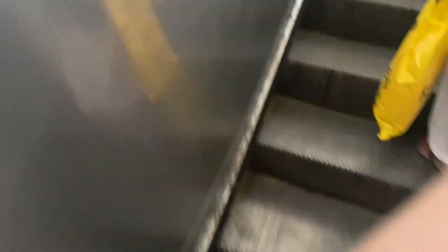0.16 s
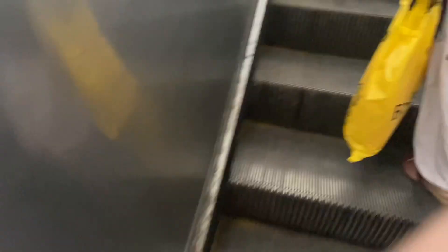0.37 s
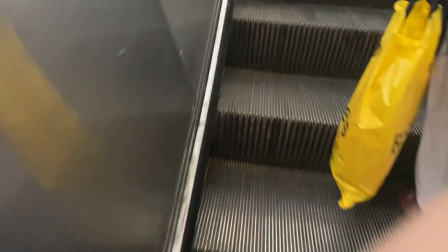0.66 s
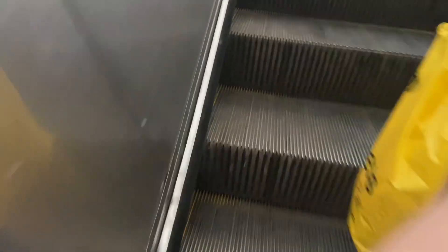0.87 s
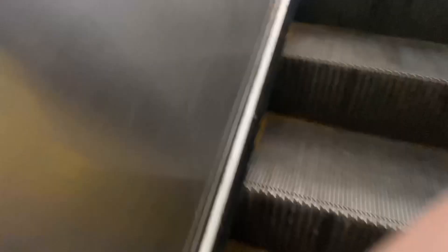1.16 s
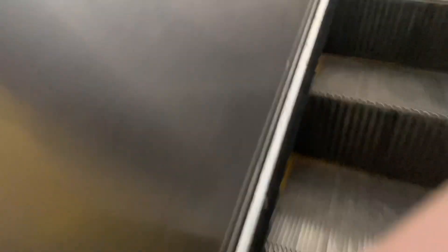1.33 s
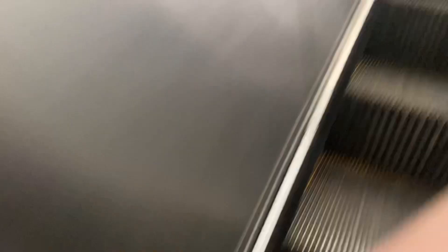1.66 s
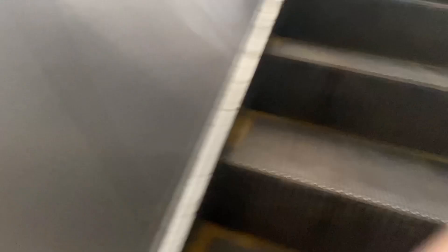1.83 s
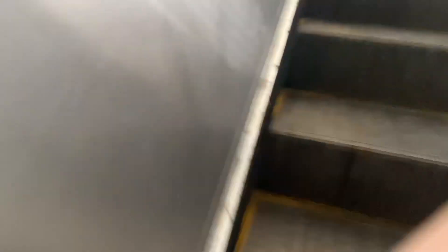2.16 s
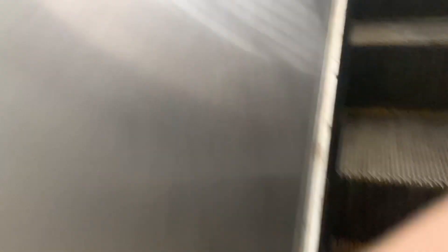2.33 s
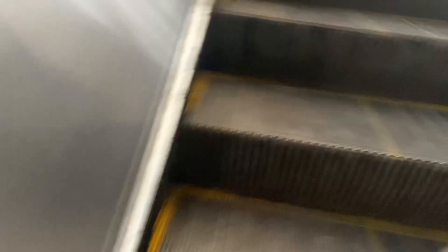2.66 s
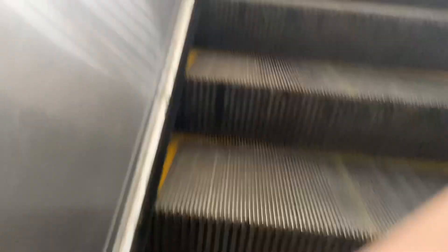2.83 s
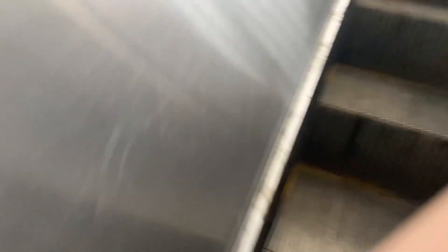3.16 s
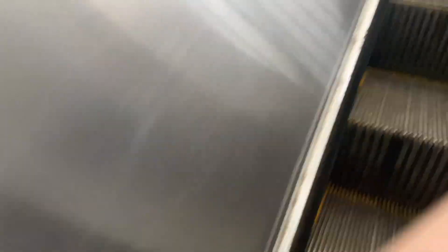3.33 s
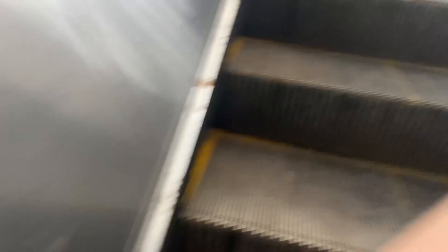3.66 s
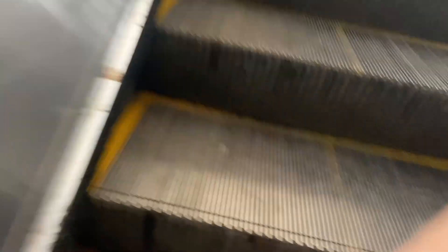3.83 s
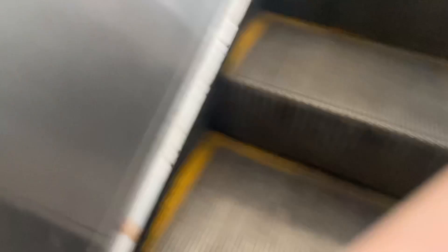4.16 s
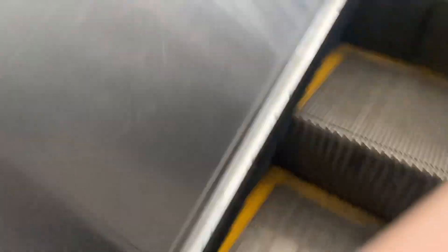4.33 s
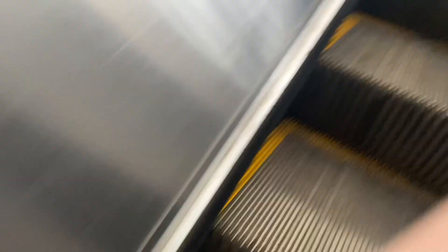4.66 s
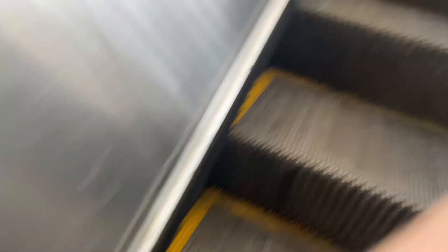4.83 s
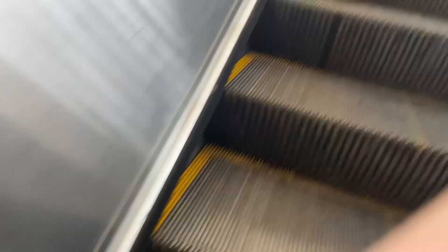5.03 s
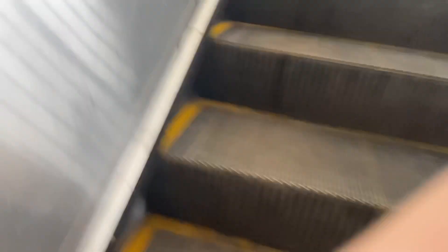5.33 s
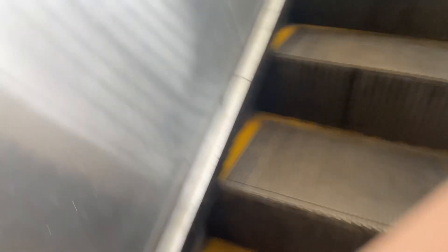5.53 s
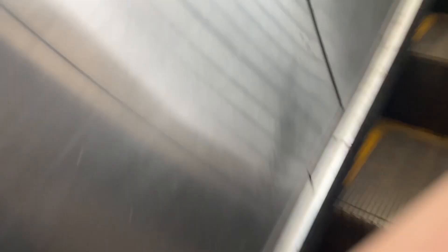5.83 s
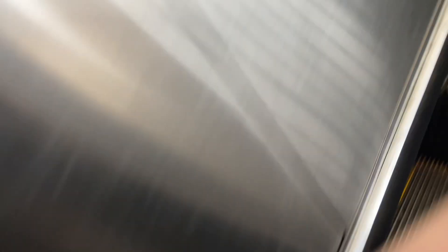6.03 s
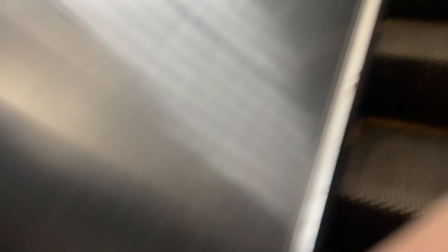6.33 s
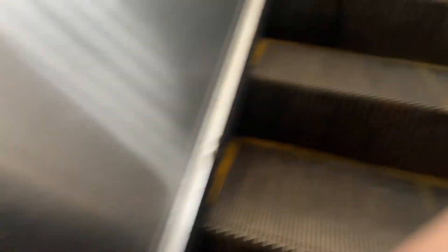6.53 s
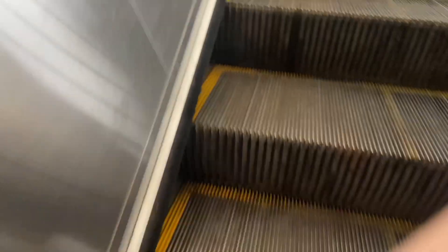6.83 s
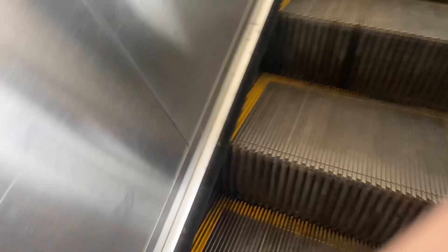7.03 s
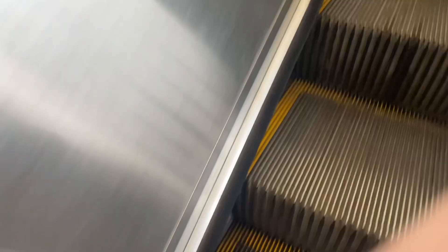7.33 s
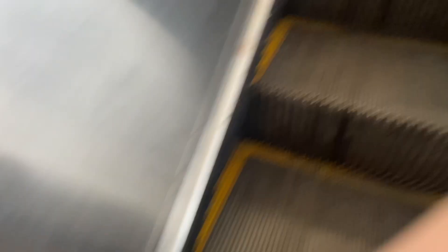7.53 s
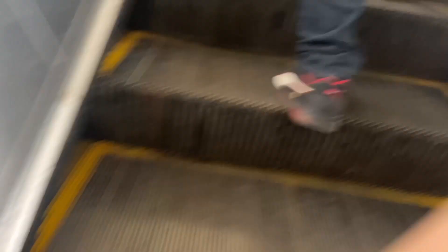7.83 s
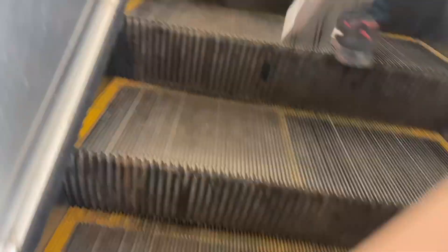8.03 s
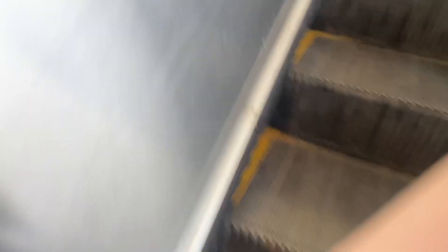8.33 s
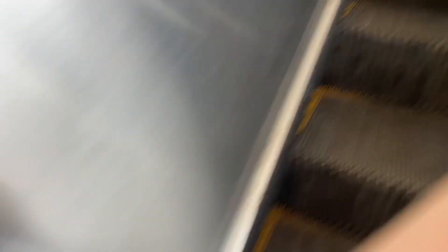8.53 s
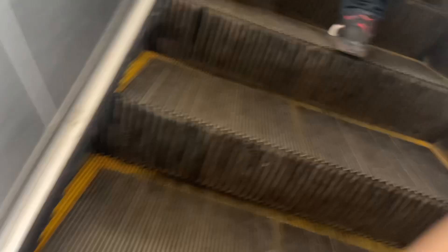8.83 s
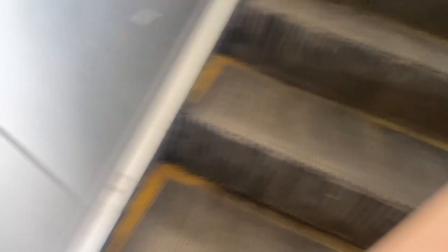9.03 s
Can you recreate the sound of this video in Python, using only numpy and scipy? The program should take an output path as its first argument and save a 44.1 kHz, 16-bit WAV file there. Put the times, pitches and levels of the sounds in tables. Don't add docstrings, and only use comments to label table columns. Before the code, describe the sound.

Low swelling escalator drone with roller roar, scattered far clanks of shoes on metal treads, then a nearby walker's quick ringing steps and bag rustles.

```python
import sys
import numpy as np
from scipy import signal
from scipy.fft import rfft, irfft, next_fast_len
from scipy.io import wavfile
from scipy.ndimage import uniform_filter1d, map_coordinates

SR = 44100
rng = np.random.default_rng(int(sys.argv[2]) if len(sys.argv) > 2 else 0)


def persist_wave(psi):
    counts = np.round(np.clip(psi, -1, 1) * 32767).astype(np.int16)
    wavfile.write(sys.argv[1], SR, np.atleast_2d(counts).T)


def field_ratio(decibels):
    return 10 ** (np.asarray(decibels, dtype=float) / 20)


N = 404838


def unit(x):
    return x / np.sqrt(np.mean(x ** 2) + 1e-20)


def along(points, hz):
    f, v = np.transpose(points)
    return np.interp(np.log(hz + 1), np.log(f + 1), v)


def wobble(rate):
    knots = rng.standard_normal(int(N * rate / SR) + 4)
    return map_coordinates(knots, [np.arange(N) * rate / SR])


def arch(start, length):
    return np.sin(np.pi * np.clip((np.arange(N) / SR - start) / length, 0, 1))


def filtered(x, response):
    n = x.shape[-1]
    m = next_fast_len(n + 8192)
    return irfft(rfft(x, m) * response(np.fft.rfftfreq(m, 1 / SR)), m)[..., :n]


def spread(common, between):
    # (frequency [Hz], level [dB])
    width = [(60, -46), (91, -43), (140, -32.5), (210, -27), (320, -14.5), (490, -8), (740, -5), (1130, -4),
             (1710, -12.5), (2600, -5.5)]
    # (frequency [Hz], level [dB])
    width_top = [(3500, -3.5), (5200, -7), (6200, 0), (7600, 10), (9000, -1), (10700, -14), (12200, 1),
                 (13300, 3), (15300, -2)]
    side = filtered(between, lambda hz: field_ratio(along(list(width) + list(width_top), hz)))
    return np.array([common + side, common - side])


def rush(spectrum, patchy_db):
    z = signal.stft(rng.standard_normal((2, N)), nperseg=512)[2]
    field = uniform_filter1d(rng.standard_normal(z.shape[1:]), size=6, axis=0)
    field = uniform_filter1d(field, size=12, axis=1)
    pair = signal.istft(z * field_ratio(patchy_db * unit(field)), nperseg=512)[1][:, :N]
    common, between = filtered(pair, lambda hz: field_ratio(along(spectrum, hz)))
    return spread(common, between) / np.std(common)


def approach():
    # (time [s], gain [dB])
    nearer = [(0, -2), (1.4, -1.5), (2.3, 0), (4, -0.5), (5.2, 0.5), (6.3, -.5), (7.8, 0), (9.18, 2)]
    s, gain_db = np.transpose(nearer)
    return np.interp(np.arange(N) / SR, s, gain_db)


def gear_hum():
    # (start [s], length [s], crest level [dB])
    loops_1 = [
        (-.4, 2.4, -25.5),
        (2.1, 4.04, -18.5),
        (5.75, 2.35, -20.5),
        (7.95, 2, -17.5),
    ]
    # (start [s], length [s], crest level [dB])
    loops_2 = [
        (.1, 2.23, -24.5),
        (2.85, 1.86, -21.5),
        (4.85, 2.38, -20.5),
        (6.75, 1.72, -21.5),
    ]
    gear_hz, node_db = 65.17, -39
    upper_db = [-31.5, -34.5]
    upper_swing_db, upper_grows = 2.5, 2.6

    turns = np.cumsum(gear_hz + 0.092 * wobble(2)) / SR
    nearer_db = approach()
    first = sum((-1) ** k * field_ratio(db) * arch(s, length) for k, (s, length, db) in enumerate(loops_1))
    second = field_ratio(node_db) + sum(field_ratio(db) * arch(s, length) for s, length, db in loops_2)
    upper = [field_ratio(db + upper_grows * nearer_db + upper_swing_db * wobble(2.5)) for db in upper_db]
    hum = 0
    for order, size in enumerate([first, second, *upper], 1):
        tone = np.sin(2 * np.pi * (order * turns + rng.random()))
        hum = hum + np.sqrt(2) * size * field_ratio(1.0 * wobble(7)) * tone
    return hum


def switching_whine():
    # (start [s], length [s], level [dB])
    spell_rows = [
        (-.08, 0.21, -50.5),
        (.15, .17, -55),
        (.72, 0.44, -52),
        (1.1, 0.18, -53),
        (1.4, 0.71, -58),
        (2.5, 1.3, -54),
    ]
    spells = sum(field_ratio(db) * np.sqrt(np.abs(arch(s, length))) for s, length, db in spell_rows)
    phase = 2 * np.pi * np.cumsum(4003 + 3.0 * wobble(8)) / SR
    return spells * field_ratio(4 + 4.2 * wobble(24)) * np.array([np.sin(phase + lag) for lag in (0, .2)])


def roar():
    # (frequency [Hz], level [dB])
    rumble = [(20, -32), (30, -19.5), (45, -3), (90, 2.5), (160, -3), (300, -9.5), (500, -33), (900, -33),
              (2500, -120)]
    # (frequency [Hz], level [dB])
    rolling = [(150, -7.5), (280, -5), (480, -6.5), (800, -12.5), (1000, -16.5), (1400, -18), (1800, -21),
               (2150, -17.5), (2450, -22), (2900, -28), (3900, -45), (6000, -120)]
    # (frequency [Hz], level [dB])
    hiss = [(2400, -20), (3300, 0), (4200, -2), (5500, -8), (6600, -17), (7600, -27), (9000, -45),
            (12000, -80)]
    # (frequency [Hz], level [dB])
    air = [(6000, -25), (7600, -10), (8600, -6), (10000, 0), (11500, -4), (12300, -9), (13300, -13),
           (15300, -15)]
    nearer_db = approach()
    uneven, grit = wobble(9.8), wobble(13)
    rumble_db = -21.5 + nearer_db + 1.3 * uneven + 1.7 * wobble(2.446)
    rolling_db = -24 + nearer_db + 0.47 * uneven + 0.59 * wobble(3.59)
    hiss_db = -44 + 0.73 * nearer_db + 0.41 * uneven + 0.6 * grit
    air_db = -55.5 + .2 * nearer_db + .6 * wobble(5.7) + 1.1 * grit
    return (field_ratio(rumble_db) * rush(rumble, patchy_db=-0.24)
            + field_ratio(rolling_db) * rush(rolling, patchy_db=1.1)
            + field_ratio(hiss_db) * rush(hiss, patchy_db=0.8)
            + field_ratio(air_db) * rush(air, patchy_db=1.6))


def hall_tail(length):
    # (frequency [Hz], t60 [s])
    hall = [(200, 0.63), (1000, 0.43), (3000, 0.27), (8000, 0.17)]
    hz, t, z = signal.stft(rng.standard_normal((2, length)), SR, nperseg=256)
    tail = signal.istft(z * field_ratio(-60 * t / along(hall, hz)[:, None]), SR, nperseg=256)[1]
    return tail / np.linalg.norm(tail[0])


def tread_ringing(t, panel_hz):
    # (frequency [Hz], level [dB], t60 [s])
    tread = [(420, 5.5, 0.12), (490, 7, 0.095), (630, 7.5, 0.1), (748, 3, 0.18), (805, 4.5, 0.36),
             (902, -3.5, 0.11), (1058, -1, 0.32), (1194, -3.5, 0.15), (1267, -10, 0.24), (1434, -1, 0.12),
             (1570, -11, 0.23), (1955, -3, 0.3), (2147, -3, 0.14), (2250, 8, 0.094), (2360, -2.5, 0.29),
             (2854, 3.5, 0.17), (3000, 9.5, 0.17), (3500, 4, 0.12)]
    hz, level_db, t60 = np.transpose(tread)[..., None]
    chance = rng.standard_normal((2, 3, len(tread), 1))
    pitch = hz * (1 + 0.0139 * chance[:, 2])
    size = field_ratio(level_db + 3.2 * chance[:, 0] - 60 * t / (.6 * t60))
    ring = (size * np.sin(2 * np.pi * pitch * t + 3 * chance[:, 1])).sum(1)
    riser = np.sin(2 * np.pi * panel_hz * t + chance[:, 1, 0])
    return ring + field_ratio(6.5 - 60 * t * panel_hz / 190) * riser


def footfalls():
    # (time [s], peak [dB], thud over peak [dB], clack over peak [dB], ringing panel [Hz])
    far_steps = [(.6125, -20, 5, -18, 580), (1.3049, -26, 15, -10, 414), (1.8311, -19.5, 6, -1, 420),
                 (2.2632, -14.5, 5, -11, 404), (2.6754, -18.5, 5, -4, 643), (3.1567, -14, 0, -12, 420),
                 (3.8298, -8, -3, -14, 605), (4.1863, -19.5, -1, -10, 467), (4.4358, -17, 5, -2, 431),
                 (4.5794, -11.5, 1.5, -4, 860), (5.0483, -13.5, -3, -17, 420)]
    # (time [s], peak [dB], thud over peak [dB], clack over peak [dB], ringing panel [Hz])
    near_steps = [(5.475, -13.5, -0.5, -1, 490), (5.7758, -15.5, -0.5, -5, 630),
                  (6.0883, -8.5, -3.5, -.5, 471), (6.415, -16, 3, -3.5, 526),
                  (6.5351, -13.5, -4.5, -4, 740), (6.6149, -10.5, -3.5, -7.5, 1110),
                  (6.7257, -8, -4, -0.5, 481), (7.0112, -16, 1, -8, 512), (7.0292, -11.5, -4, -3.5, 476),
                  (7.0758, -14.5, -0.5, -0.5, 1245), (7.2106, -8.5, -1.5, -10, 413),
                  (7.3104, -6.5, -6.5, -1, 422), (7.6099, -4.5, -5, -1, 805), (7.9064, -10, -3, -5.5, 1320),
                  (8.2342, -16.5, 3, 4, 645), (8.3254, -18.5, 2.5, -6, 560), (8.5707, -7, -4.5, -1, 411),
                  (8.7385, -13.5, -16, -8, 1180), (8.9086, -14.5, -15, -6.5, 468)]
    # step ringing dB, rattle dB, rattle t60 s, hall dB
    far_shoe, near_shoe = (-19, 7.5, .055, -15), (-17, 7, .085, -12)
    rise_s, softer_rise = 0.00074, 0.5

    out, t = np.zeros((2, N + 2 * SR)), np.arange(SR // 3) / SR
    contacts = [(*row, *far_shoe) for row in far_steps] + [(*row, *near_shoe) for row in near_steps]
    for s, db, thud_db, clack_db, panel_hz, ring_db, rattle_db, rattle_s, hall_db in contacts:
        landing = 1 - np.exp(-t / (rise_s * field_ratio(-softer_rise * db)))
        edge_db = -28.5 + .3 * clack_db - 0.84 * db
        colour = [(200, thud_db - 15), (400, thud_db), (800, thud_db), (1200, 0.28), (1650, -3.2),
                  (2050, clack_db), (2500, clack_db - 3.0), (3100, edge_db + 0.5), (3600, edge_db),
                  (6000, edge_db - 8.0), (8000, edge_db - 52)]
        ring = tread_ringing(t, panel_hz)
        crack = field_ratio(4 - 60 * t / .01)
        rattle = (field_ratio(-60 * t / rattle_s) + crack) * rng.standard_normal((2, len(t)))
        blow = landing * (field_ratio(ring_db) * ring + field_ratio(rattle_db) * rattle)
        pair = filtered(blow, lambda f: field_ratio(along(colour, f)))
        echo = signal.fftconvolve(pair[:1], hall_tail(SR // 2), axes=1)
        at = round(s * SR)
        out[:, at:at + len(t)] += field_ratio(db) * spread(*pair)
        late = at + 500
        out[:, late:late + echo.shape[1]] += field_ratio(db + hall_db) * spread(*echo)
    return out[:, :N]


def rustles():
    # (time [s], peak [dB])
    crinkles = [(0.9901, -50), (1.3748, -25), (1.8811, -33), (2.1876, -28), (2.4394, -42), (3.1687, -29),
                (3.4486, -21), (3.5199, -39), (5.2874, -42), (6.5301, -25), (6.6104, -21), (6.9262, -39),
                (7.0334, -58), (7.1681, -44), (7.2414, -32), (7.3043, -46), (7.3961, -34), (7.4734, -48),
                (7.5522, -28), (7.6071, -37), (8.0346, -60), (8.2342, -43), (8.569, -26.5), (8.6223, -54),
                (8.733, -44), (8.8433, -44)]
    # (frequency [Hz], level [dB])
    crinkle_colour = [(3000, -14), (6000, -4), (10000, 0), (13000, -8), (15500, -9)]
    out, length = np.zeros((2, N)), 4096
    u = np.arange(length) / SR / 0.0068
    for s, db in crinkles:
        crinkle = filtered(rng.standard_normal((2, length)), lambda f: field_ratio(along(crinkle_colour, f)))
        at = round(s * SR)
        out[:, at:at + length] += field_ratio(db - 24.5) * u * np.exp(1 - u) * spread(*unit(crinkle))
    return out


def scuffs():
    # (time [s], length [s], level [dB], centre [Hz], width [Hz])
    drags = [
        (1.38, .1, -57, 9100, 5160),
        (1.82, 0.13, -50, 4890, 6000),
        (2.18, 0.074, -55, 9450, 3000),
        (2.428, 0.21, -39.5, 4430, 1700),
        (2.43, 0.11, -52, 9150, 3500),
        (7.15, .3, -55, 9900, 3500),
        (8.2, .15, -55, 10000, 3500),
    ]
    out, t = np.zeros((2, N)), np.arange(N) / SR
    for s, length, db, centre_hz, width_hz in drags:
        part = slice(round(s * SR), round((s + 2 * length) * SR))
        u = (t[part] - s) / (0.31 * length)
        noise = rng.standard_normal((2, len(u)))
        rub = filtered(noise, lambda f: np.exp(-((f - centre_hz) / width_hz) ** 2 * 2))
        out[:, part] += field_ratio(db) * u * np.exp(1 - u) * spread(*unit(rub))
    return out


def ticks():
    # (time [s], peak [dB])
    snaps = [
        (1.8811, -30),
        (3.4486, -37),
        (5.2874, -43),
        (6.6124, -39),
        (7.3961, -40),
    ]
    out, t = np.zeros((2, N)), np.arange(256) / SR
    for s, db in snaps:
        snap = np.diff(rng.standard_normal((2, 257))) * field_ratio(db + 1.5 - 60 * t / .006)
        at = round(s * SR)
        out[:, at:at + 256] += spread(*snap)
    return out


def panel_rings():
    # (time [s], frequency [Hz], peak [dB], t60 [s])
    notes_held = [(2.264, 716, -24, 0.12), (2.676, 623, -22, 0.12), (3.832, 610, -17, 0.13),
                  (5.478, 491, -19, 0.24), (6.092, 2513, -12.5, 0.049), (6.1, 773, -19, 0.27),
                  (6.1, 490, -13, 0.15), (6.49, 763, -25, 0.56), (6.617, 1880, -26.5, 0.21),
                  (6.728, 2250, -14.5, 0.099), (6.728, 3550, -23, 0.051), (7.085, 1250, -20, 0.22),
                  (7.215, 603, -14.5, 0.13), (7.311, 1040, -16.5, 0.055), (7.311, 2163, -18.5, 0.25),
                  (7.612, 2360, -14, 0.15), (7.62, 805, -26.5, 0.85), (8.326, 658, -12, 0.081)]
    out, t = np.zeros((2, N)), np.arange(SR // 3) / SR
    rise = 1 - np.exp(-t / 0.0014)
    for s, ring_hz, db, t60 in notes_held:
        drift = np.cumsum(rng.normal(0, 0.0043, (2, len(t))), axis=1)
        tone = np.sin(2 * np.pi * (ring_hz * t + drift))
        at = round(s * SR)
        out[:, at:at + len(t)] += spread(*(rise * field_ratio(db - 60 * t / t60) * tone))
    return out


def scene():
    machine = gear_hum() + switching_whine() + roar()
    return machine + footfalls() + rustles() + scuffs() + ticks() + panel_rings()


def gated_treble(x):
    # (part [0 common, 1 between], from [Hz], to [Hz], rise [dB])
    quiet_bands = [(0, 6200, 6550, -2), (0, 6550, 6900, 1), (0, 6900, 7600, 11), (0, 7600, 8300, 6),
                   (0, 12200, 12600, 1.5), (0, 12600, 14450, 10), (0, 14450, 15100, 1),
                   (0, 15100, 15800, 2.6), (1, 9300, 9650, -1.5), (1, 9650, 11700, 9),
                   (1, 14000, 15000, -.3), (1, 15000, 15800, 3.5), (0, 15800, 22050, 90),
                   (1, 15800, 22050, 90)]
    hz, _, z = signal.stft(np.array([x[0] + x[1], x[0] - x[1]]) / 2, SR, nperseg=2048)
    for part, lo_hz, hi_hz, rise_db in quiet_bands:
        bins = np.flatnonzero((hz >= lo_hz) & (hz < hi_hz))
        for band in np.array_split(bins, max(1, (hi_hz - lo_hz) // 220)):
            size = np.linalg.norm(z[part, band], axis=0)
            threshold = field_ratio(rise_db + rng.normal(0, 1.9, len(size))) * np.median(size)
            z[part, band] *= size > threshold
    common, between = signal.istft(z, SR, nperseg=2048)[1][:, :N]
    return np.array([common + between, common - between])


def top_cut(x):
    return signal.sosfilt(signal.butter(12, 15780, fs=SR, output="sos"), x)


def record(dry):
    # (frequency [Hz], left leads by [rad])
    port_lead = [(100, -.03), (650, -.2), (1500, -.1), (2300, .9), (3500, .8), (5000, .6), (5600, 1.1),
                 (6500, 0)]
    # (frequency [Hz], left over right [dB])
    port_db = [(60, -.4), (250, -1.3), (600, -.8), (1200, -.3), (2100, -1.8), (2600, .2), (4200, -.6),
               (6000, .1)]
    half = np.array([[.5], [-.5]])

    def ports(hz):
        return field_ratio(half * along(port_db, hz)) * np.exp(1j * half * along(port_lead, hz))

    picked = filtered(dry, ports)
    soft = picked / (1 + np.abs(picked / .93) ** 10) ** (1 / 10)
    return top_cut(gated_treble(soft))


dry = scene()
out = record(dry)
persist_wave(out)
```